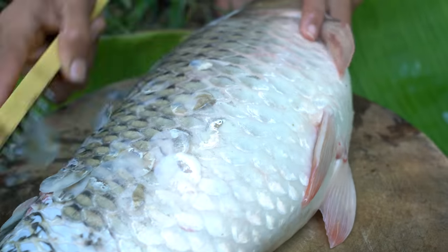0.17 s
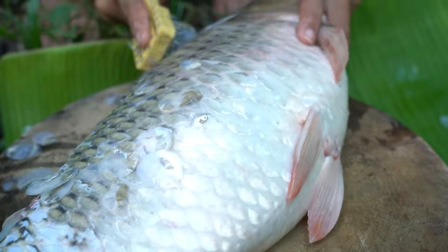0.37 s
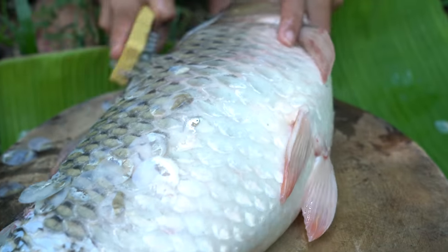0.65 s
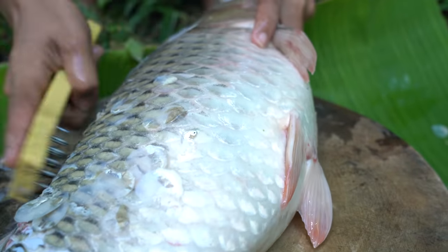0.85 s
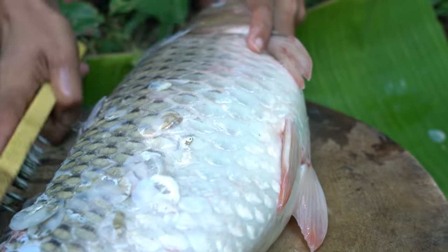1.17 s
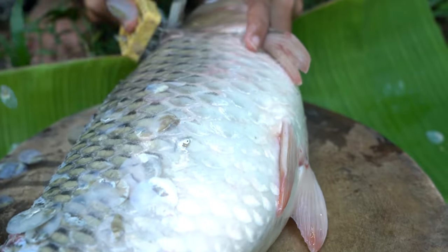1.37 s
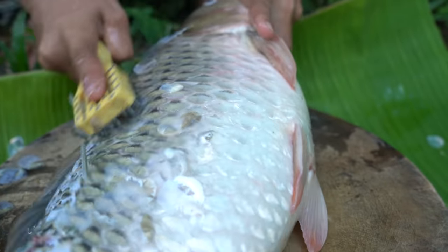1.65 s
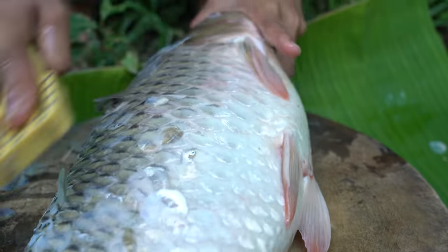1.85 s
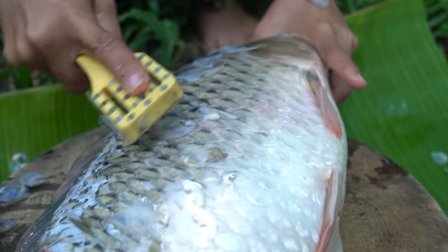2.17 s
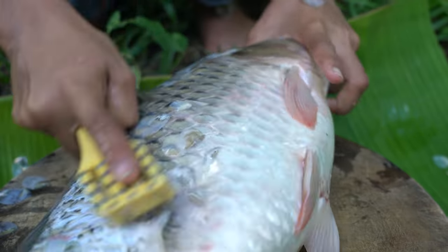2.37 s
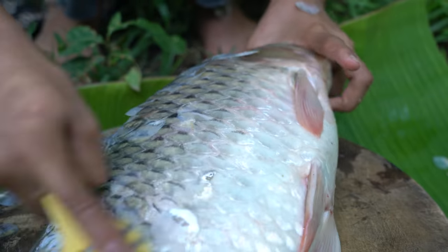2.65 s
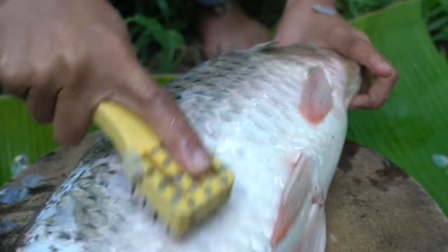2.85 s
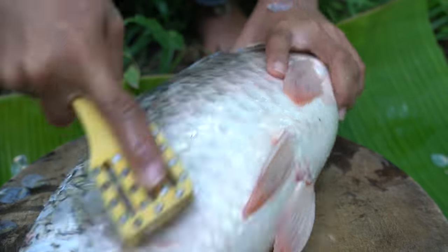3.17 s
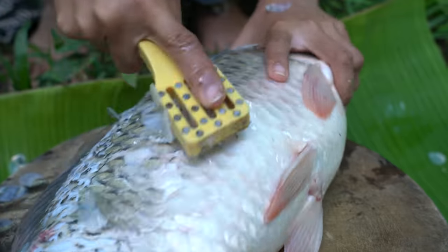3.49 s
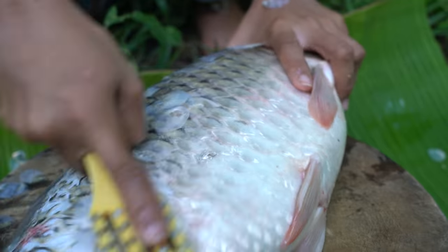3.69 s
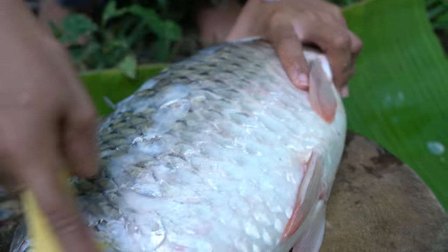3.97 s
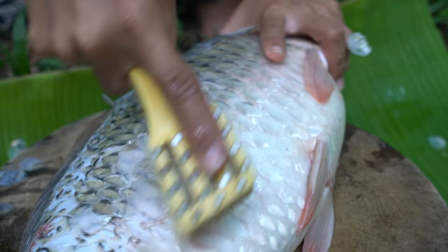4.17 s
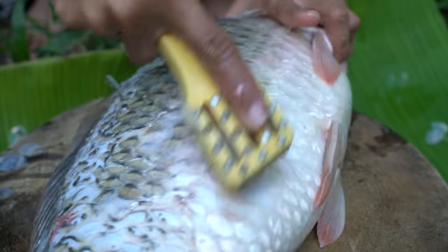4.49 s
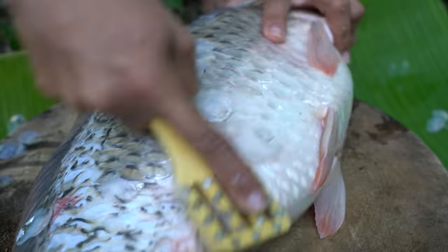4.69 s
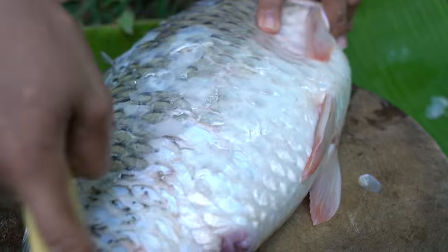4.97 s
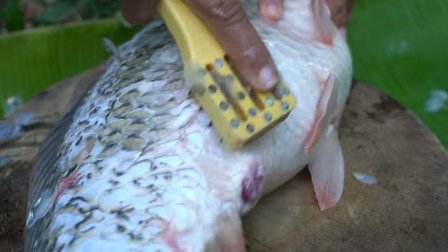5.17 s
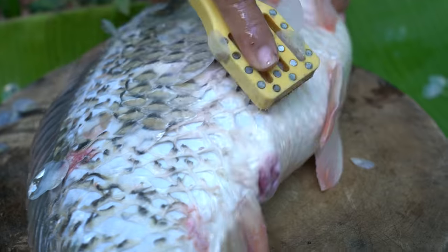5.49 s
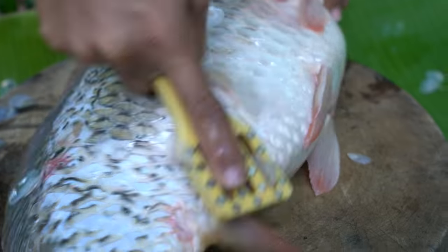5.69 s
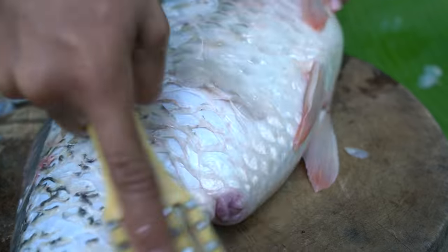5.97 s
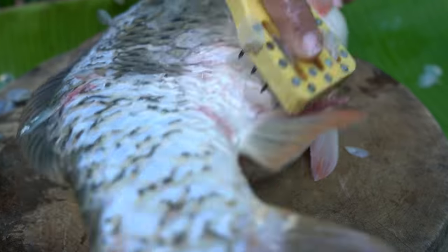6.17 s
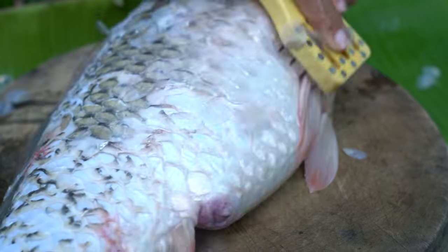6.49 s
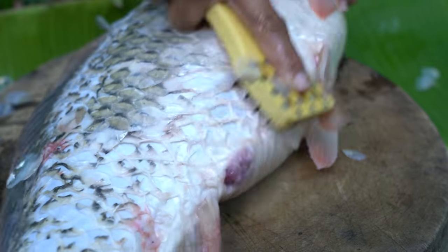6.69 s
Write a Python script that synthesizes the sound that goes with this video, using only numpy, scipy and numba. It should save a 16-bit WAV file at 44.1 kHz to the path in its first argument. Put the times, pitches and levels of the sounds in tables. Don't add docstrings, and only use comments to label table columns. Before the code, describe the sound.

Dry, gritty bursts of rasping repeat about three times a second, each roughly a tenth of a second long, full of bright clicks and high pings. Between them come light return brushes, small ticks of loose scales and spits of slime. The scraping gradually weakens and grows duller, then a cluster of wooden knocks and a brighter last scrape. Close outdoor microphone, no echo, soft garden hiss and faint wind rumble.

```python
import sys
import numpy as np
from scipy import signal
from scipy.fft import rfft, irfft
from scipy.io import wavfile
from scipy.ndimage import uniform_filter1d
from numba import njit

SR = 44100
rng = np.random.default_rng(int(sys.argv[2]) if len(sys.argv) > 2 else 0)


def undo_db(level):
    steps = np.asarray(level, float) / 20
    return 10 ** steps


def to_wav(sig):
    pcm = np.clip(np.atleast_2d(sig), -1, 1) * 32767
    pcm = np.round(pcm).astype(np.int16)
    wavfile.write(sys.argv[1], SR, pcm.T)


N = 301644
TIME = np.arange(N) / SR


def level(x, db):
    return x * undo_db(db) / np.sqrt(np.mean(x ** 2))


def noise():
    return rng.standard_normal(N)


def curve(table, s):
    return np.interp(s, *np.transpose(table))


def samples(s):
    return (np.asarray(s) * SR).astype(np.int64)


def colour(x, points):
    hz, db = np.transpose(points)
    grid = np.maximum(np.arange(2049) * SR / 4096, 1)
    log_gain = np.interp(np.log(grid), np.log(hz), db) * np.log(10) / 20
    cep = irfft(log_gain)
    cep[1:2048] *= 2
    cep[2049:] = 0
    return signal.fftconvolve(x, irfft(np.exp(rfft(cep))))[:N]


def band(x, hz, width_hz):
    return signal.lfilter(*signal.iirpeak(hz, hz / width_hz, SR), x)


@njit
def rings(at, hz, cycles, size, n):
    out = np.zeros(n)
    for k in range(len(at)):
        p = np.exp((2j * np.pi - np.log(1000) / cycles[k]) * hz[k] / SR)
        z = size[k] + 0j
        for i in range(at[k], min(n, at[k] + int(cycles[k] * SR / hz[k]))):
            out[i] += z.imag
            z *= p
    return out


def impulses(at, size):
    return np.bincount(at, size, N)[:N]


def bursts(at, size, tail_s):
    return signal.lfilter([1], [1, -np.exp(-1 / (tail_s * SR))], impulses(at, size))


def walk(rate):
    k = int(SR / rate)
    return 1.2 * uniform_filter1d(rng.standard_normal(N // 100)[np.arange(N) // k], k)


def dullness(hz):
    return 5.5 * np.log2(hz / 3000)


# frequency in Hz, level in dB.
AIR_SHAPE = [(40, 10.5), (150, 5.5), (400, 0), (3500, -8.5), (8600, -12.5), (15500, -25)]
# time in seconds, level in dB.
WIND_GUSTS = [(0.0, -54), (0.13, -58), (0.36, -49.5), (1.6, -55.5), (4.53, -56.5), (4.67, -59.5),
              (4.8, -48.5), (4.89, -61), (5.28, -54.5), (6.32, -54.5), (6.38, -52), (6.65, -63), (6.8, -54),
              (6.84, -54)]


def air():
    sway = band(band(noise(), 10.53, 1.73), 14.3, 18)
    wind = sway * undo_db(curve(WIND_GUSTS, TIME))
    fade_db = -0.9 * TIME
    hiss = colour(noise(), AIR_SHAPE) * undo_db(fade_db)
    return level(hiss, -56) + level(wind, -44.5)


# time in seconds, peak in dB, ring in Hz.
BLOCK_TAPS = [(1.269, -19, 660), (6.3984, -10, 1370), (6.4042, -10.5, 1300), (6.4083, -17, 1600),
              (6.413, -19.5, 560), (6.4165, -23.5, 480), (6.4203, -15, 1150), (6.425, -28, 750),
              (6.377, -34.5, 53), (2.598, -26, 900), (5.8, -36, 740), (2.985, -38.5, 260)]


def taps():
    s, db, hz = np.transpose(BLOCK_TAPS)
    at = samples(s)
    weight = undo_db(db - 20) * np.minimum(hz / 500, 1)
    thud = bursts(at, weight, 0.0085) * level(band(noise(), 600, 900), 0)
    return rings(at, hz, 5.6 + 0 * hz, undo_db(db + 5.5), N) + thud


# time in seconds, peak in dB.
SLIME_THREADS = [(3.1132, -8.5), (3.1606, -15), (3.4033, -30), (3.474, -18), (3.6631, -27.5),
                 (3.818, -20.5), (3.891, -23.5), (4.1425, -19), (4.1699, -13), (4.1774, -14), (4.5104, -24),
                 (4.8218, -8), (4.8838, -20)]


def spits():
    s, db = np.transpose(SLIME_THREADS)
    return bursts(samples(s), undo_db(db + 2), 0.0004) * level(band(noise(), 13000, 5500), 0)


# time in
# seconds, peak in dB, ring in Hz.
LOOSE_TICKS = [(0.9243, -15.5, 1370), (0.9385, -20, 1630), (1.2174, -14.5, 1760), (1.4785, -12.5, 3000),
               (1.5462, -15, 1360), (1.6377, -12, 3720), (1.8785, -10, 3120), (2.184, -14, 4500),
               (2.335, -25.5, 6800), (2.8455, -9.5, 4140), (2.87, -12, 3320), (2.9072, -18, 3470),
               (3.5645, -14.5, 1830), (4.2235, -14, 3200), (4.283, -19.5, 5050), (4.885, -6, 3700),
               (4.962, -11, 3700), (5.0454, -24, 1070), (5.219, -13, 3180), (5.2754, -22, 3930),
               (5.3189, -18.5, 5400), (5.5911, -16.5, 2800), (5.9857, -18, 4500), (6.227, -18, 3820),
               (6.3536, -19.5, 2430), (6.395, -6, 4200), (6.5899, -10, 4140),
               (0.17, -16, 2450), (0.7758, -20.5, 5580), (0.7983, -23, 4610), (1.4602, -22, 1160),
               (1.5198, -29, 3960), (1.6193, -20, 8700), (1.8439, -20, 3190), (1.8515, -22.5, 1010),
               (2.736, -34, 8510), (2.881, -13, 3230), (3.0813, -26, 9560), (3.095, -13, 3320),
               (3.2137, -24, 3170), (3.419, -15, 3270), (3.5996, -24, 3900), (3.6646, -25.5, 11580),
               (3.7554, -16.5, 1890), (3.9236, -24, 1600), (3.9308, -21.5, 5170), (3.9544, -25, 7170),
               (4.209, -22, 2950), (4.295, -25, 4970), (4.536, -17, 3770), (4.5465, -14, 3210),
               (4.5592, -31, 3340), (4.5897, -26, 4610), (4.8916, -13, 2800), (4.9343, -19, 3170),
               (4.9604, -14, 4720), (4.9668, -15, 5100), (5.0031, -30, 1210), (5.0259, -30, 1140),
               (5.069, -29, 6550), (5.0776, -19, 4110), (5.2231, -20, 3210), (5.2358, -24, 1250),
               (5.3666, -27, 4220), (5.4172, -19, 3620), (5.6265, -18.5, 3250), (5.6996, -28, 5040),
               (5.749, -18, 3980), (6.0418, -33, 3300), (6.0755, -14.5, 8310), (6.164, -19.5, 3850),
               (6.1886, -22, 2950), (6.3392, -23, 1090), (6.5555, -26, 1210), (6.6182, -18, 2890),
               (6.6903, -30, 2020), (6.7196, -16.5, 7340)]


def plinks():
    s, db, hz = np.transpose(LOOSE_TICKS)
    at, chance = samples(s), rng.standard_normal((len(s), 3)).T
    side = np.sign(chance[0])
    click = rings(at, hz * 1.27, 3.7 + 0 * hz, side * undo_db(db - 14), N)
    ring = rings(at, hz, 1.5 + hz * 0.011, side * undo_db(db - 12.5), N)
    ring += rings(at + 25, hz * (1 + 0.07 * chance[1]), 3 + hz * 0.0065, undo_db(db - 16), N)
    dull_db = dullness(hz)
    grit = bursts(at, undo_db(db - 22.5 + dull_db), 0.002) * level(colour(noise(), RASP_SHAPE), 0)
    spit_db = db - 21.5 + dull_db + np.minimum(dull_db, 0) + 4.3 * chance[2]
    spit = bursts(at, undo_db(spit_db), 0.00094) * level(colour(noise(), FIZZ_SHAPE), 0)
    return click + ring + grit + spit


# time in seconds, rasp in dB, dull rustle in dB re rasp.
HAND_SHIFTS = [(0.2, -65, 6), (0.55, -61.5, 13), (0.85, -58.5, 2.5), (1.25, -62, 16), (1.55, -62, 1),
               (2.0, -64.5, 10), (2.36, -70, 8), (2.72, -65, 4), (3.05, -58.5, 8), (3.36, -64, -2),
               (3.72, -64, -2), (4.33, -69, 2), (4.7, -60.5, 6), (5.03, -65, 13.5), (5.38, -66, 6),
               (5.7, -70.5, -4), (6.28, -65, 10.5), (6.67, -75, -7)]


def shifting(trail_gain):
    s, rasp_db, rustle_db = np.transpose(HAND_SHIFTS)
    loose = (undo_db(np.interp(TIME, s, rasp_db)) + trail_gain) * undo_db(5 * walk(40))
    return loose * undo_db(np.array([0 * TIME, np.interp(TIME, s, rustle_db), 0 * TIME]))


def swell(start, length, rise, first_db, last_db):
    t = TIME - start
    top = length * np.clip(rise, 0.05, 0.95)
    land_db_s, lift_db_s = 9000, 1507
    edges = land_db_s * np.minimum(t, 0) - lift_db_s * np.maximum(t - length, 0)
    away = np.interp(t, [0, top, length], [1, 0, 1]) ** 1.83
    return away * np.where(t < top, first_db, last_db) + edges


# start in seconds, length in seconds, rasp in dB,
# wet fizz in dB re rasp.
RETURN_SLIDES = [(0.147, 0.022, -32, -5), (0.446, 0.032, -42.5, -4), (1.14, 0.02, -24, -9.5),
                 (1.198, 0.033, -51, -32), (1.451, 0.045, -33.5, -13), (1.588, 0.024, -26, -2),
                 (1.609, 0.045, -37.5, -0.5), (1.848, 0.012, -39, -4), (1.881, 0.012, -37, 14),
                 (2.59, 0.095, -28.5, -1.5), (2.866, 0.03, -35.5, -7.5), (2.933, 0.076, -30.5, -3.5),
                 (3.211, 0.082, -40, -10.5), (3.276, 0.028, -26, -1.5), (3.6, 0.032, -36, 3.5),
                 (3.643, 0.022, -37, -1), (3.884, 0.031, -28, -8), (4.244, 0.055, -43.5, -0.5),
                 (4.595, 0.022, -24.5, -3), (4.639, 0.019, -40.5, -8), (4.858, 0.043, -26.5, -13),
                 (4.902, 0.075, -38, -27), (5.21, 0.021, -46, -17), (5.272, 0.073, -46, -5.5),
                 (5.615, 0.056, -39.5, -4.5), (5.694, 0.021, -49, 2.5), (5.889, 0.032, -53, -2),
                 (5.951, 0.049, -46, -7), (6.149, 0.079, -48.5, -9), (6.4, 0.01, -26, -1),
                 (6.58, 0.047, -39.5, 5)]


def slides():
    gains = 0
    for start, length, db, fizz_db in RETURN_SLIDES:
        slide = undo_db(db + swell(start, length, 0.61, -21.5, -21.5))
        gains = gains + np.outer(undo_db(np.array([0, -23, fizz_db])), slide)
    return gains


# start in seconds, length in seconds, rasp at full pressure in dB,
# share of the length before full pressure (0-1), hum of the tool in dB re rasp.
SCRAPES = [(0.0, 0.1, -13.5, 0.54, -5.5), (0.306, 0.13, -15.5, 0.38, -4.5),
           (0.619, 0.14, -15.5, 0.32, -10.5), (0.955, 0.14, -17.5, 0.43, -6),
           (1.304, 0.12, -15, 0.49, -5.5), (1.665, 0.14, -16, 0.35, -7), (2.052, 0.14, -19.5, 0.07, -9),
           (2.406, 0.15, -18, 0.38, -4.5), (2.745, 0.092, -19.5, 0.48, -14.5),
           (3.094, 0.087, -20.5, 0.71, -6.5), (3.42, .13, -19.5, 0.53, -1), (3.753, 0.11, -19, 0.73, -6.5),
           (4.063, 0.13, -17, 0.54, -7.5), (4.375, 0.15, -20.5, 0.45, -5), (4.726, 0.12, -20.5, 0.82, -2),
           (5.072, .13, -22.5, 0.33, -5), (5.409, 0.16, -25, 0.2, -6.5), (5.742, .13, -26, 0.51, 0),
           (6.072, 0.088, -31, 0.2, 4), (6.4487, 0.093, -28.5, 0.1, -27), (6.709, 0.11, -20, 0.72, -11.5)]
# time in seconds, extra fizz in dB.
WETNESS = [(0, 2), (0.7, -1), (1.7, 1), (2.4, -0.5), (3.2, 0.5), (3.8, 1), (4.4, -3), (5.1, -3), (5.8, -1),
           (6.5, 6), (6.8, -5.5)]


def strokes():
    gains, trails = 0, 0
    bed_db = -3.5
    for start, length, db, rise, hum_db in SCRAPES:
        fizz_db = -4 + curve(WETNESS, start)
        press = undo_db(db + bed_db + swell(start, length, rise, -19, -8.5))
        gains = gains + np.outer(undo_db(np.array([0, hum_db, fizz_db])), press)
        after = TIME - start - length
        trails = trails + (after > 0) * undo_db(db - 42 - 132 * np.abs(after))
    return gains, trails


# time in seconds, change in dB.
LEVEL_CHANGES = [(0.435, -7), (0.535, -7), (0.624, -5), (0.661, -6), (0.711, 6.5), (0.815, 8), (0.906, 8),
                 (1.176, -12.5), (1.259, 6), (1.697, -5.5), (2.068, -7.5), (2.092, 7), (2.114, -6),
                 (2.167, 6.5), (2.47, -5), (2.408, 6), (2.62, 5.5), (3.42, 6), (5.746, 7), (5.815, 5),
                 (3.104, 6), (3.545, -7.5), (3.761, 6.5), (4.525, -9), (4.738, -5), (4.792, -9), (5.128, -4),
                 (4.876, -9), (5.756, -9), (6.546, -8.5), (6.714, -10)]


def contact():
    gains, trails = strokes()
    gains = gains + slides() + shifting(trails)
    change_db = sum(db * np.exp(-((TIME - s) / 0.0058) ** 2) for s, db in LEVEL_CHANGES)
    return uniform_filter1d(gains * undo_db(change_db), size=60)


def crackle(per_s, spread_db, tail_s, cycles, low_hz, octaves):
    most = int(N / SR * 3000)
    chance = rng.random((most, 4))[:int(N / SR * per_s)].T
    at = (chance[0] * N).astype(np.int64)
    size = undo_db(-spread_db * np.log(1 - 0.97 * chance[1]) + 2.8 * walk(130)[at])
    grit = level(bursts(at, size, tail_s) * noise(), 0)
    climb = octaves * (0.5 + 0.334 * walk(45)[at] + 0.14 * chance[2])
    hz = np.clip(low_hz * 2 ** climb, 100, 15000)
    ring = rings(at, hz, cycles * (1.6 + chance[3]), size * np.sign(chance[3] - 0.5), N)
    return grit, level(ring, 0)


# frequency in Hz, level in dB.
RASP_SHAPE = [(470, -41.5), (800, -11), (1580, -3.5), (2100, -4.5), (3270, -0.5), (6300, -3), (8190, -43),
              (13900, -120)]
# frequency in Hz, level in dB.
FIZZ_SHAPE = [(3530, -37), (6000, -0.5), (8330, 3.5), (11300, -10), (13500, -4), (15200, -14.5),
              (16200, -17)]
# resonance in Hz, width in Hz, level in dB, change in dB per s as the grip shifts.
TOOL_MODES = [
    (1700, 290, -7, 2.3),
    (830, 800, 2, -1.87),
    (380, 140, -3, -6),
    (130, 140, -20, 0.5),
]


def rasp(rasp_gain, hum_gain, fizz_gain):
    grit, ring = crackle(750, 2.4, 0.0012, 20, 2200, 1.3)
    spit, ping = crackle(900, 6.1, 0.0021, 37, 8496, 0.14)
    rub, knock = crackle(400, 0.63, 0.0017, 14.0, 842, 0.97)
    body = level(colour(grit, RASP_SHAPE), 0.095) + level(ring, -4.5)
    slick = undo_db(np.interp(TIME, (1.8, 2.2), [-5, 0]))
    fizz = level(colour(0.56 * grit + 0.7 * spit, FIZZ_SHAPE), 0.17) + level(ping, -4) * slick
    drive = 0.13 * grit + 3.9 * rub
    hollow = sum(undo_db(db + drift * TIME) * band(drive, hz, width) for hz, width, db, drift in TOOL_MODES)
    hum = level(hollow, -4) + level(knock, -13)
    return rasp_gain * body + hum_gain * hum + fizz_gain * fizz


def small_scales(press_db):
    per_s = 40
    count = int(per_s * N / SR)
    s, chance = (np.arange(count) + rng.random(count)) / per_s, rng.standard_normal((count, 3)).T
    db = press_db[samples(s)] + 2 + 2.5 * chance[0]
    return np.transpose([s, db, 3300 * 2 ** (0.4 * chance[1]), -3 + 5 * chance[2]])


def slime_pops():
    count = int(45 * N / SR)
    s, chance = rng.random(count) * N / SR, rng.standard_normal((count, 2)).T
    db = np.interp(s, *np.transpose(HAND_SHIFTS)[:2]) + 3 - 1.5 * chance[0]
    hz = np.clip(6370 * 2 ** (0.4 * chance[1]), 900, 14000)
    return np.transpose([s, db, hz, 2 + 0 * s])


def touches(press_db):
    return [(row[0] + 0.00084, press_db[int(row[0] * SR) + 100] + 10, 3300, -1) for row in SCRAPES]


# time in seconds, peak in dB.
TOOTH_PINGS = [(0.106, -6), (0.3156, 8.5), (0.3588, -7), (0.639, 6.5), (0.7195, 7.5), (0.731, 6.5),
               (1.063, 5.5), (1.0724, 5), (0.059, 2), (0.759, -6), (1.089, -6), (1.409, 2.5), (1.7221, 7.5),
               (1.8882, -22), (2.173, -4), (2.487, -3), (2.4552, 2.5), (2.973, -8), (3.1138, 4.5),
               (3.2837, -0.5), (3.527, 1.5), (3.6172, -15), (3.892, -3.5), (3.8974, 0.5), (4.606, -9),
               (4.649, -11), (5.4721, -2), (5.7624, -4), (6.4507, -4), (6.527, 0), (2.52, -1), (2.766, 1),
               (3.534, -3.5), (4.406, -12), (6.836, -4.5)]


def pings():
    return [(s, db, 8680 * (1 + 0.081 * rng.standard_normal()), -8.5) for s, db in TOOTH_PINGS]


# time in seconds, peak in dB, ring in Hz, brightness in dB re peak.
BIG_SNAPS = [(0.013, 2.5, 3700, 1), (0.0891, -8.5, 3760, 12.5), (0.3461, -5.5, 3640, 10.5),
             (0.3844, 5.5, 3300, -1), (0.3893, 1, 2180, 0), (0.3998, 8, 2460, -16), (0.4164, 4, 3420, -4),
             (0.4461, 9, 3820, -11.5), (0.7462, 9, 4300, -8), (0.988, -1, 3600, -1), (1.0429, 4, 3460, -19),
             (1.0522, 8, 4970, -10), (1.3809, 6, 5600, -27), (1.3986, 7, 5100, -1.5),
             (1.5902, -5.5, 3450, -9.5), (1.7844, -9.5, 3330, 8.5), (2.1608, 2, 4200, -13),
             (2.5232, 9.5, 3120, -10), (2.7689, 1.5, 3380, -4), (2.8218, 0.5, 3780, -25),
             (3.4836, 2, 3660, -33), (4.1425, -11, 3400, -30), (4.539, -3, 3450, -17),
             (5.1792, 2, 4630, -11), (5.7681, -1.5, 3000, -8.5), (6.4881, 1.5, 4020, -14),
             (6.8048, -2, 2970, -15), (6.8167, 1, 2750, -2)]
# time in seconds,
# peak in dB, ring in Hz.
TOOL_JOLTS = [(0.3725, -3, 1520), (0.961, -11, 1490), (1.0124, -3.5, 1830), (1.4222, -3.5, 2020),
              (1.6844, -19, 2280), (2.073, -12, 2540), (2.4621, -2, 2050), (2.5356, 0, 4030),
              (2.8028, 1, 1460), (3.475, 0.5, 1280), (3.7781, -4, 1790), (4.0914, 0.5, 1860),
              (4.3834, -11.5, 1790), (4.4115, -1, 1820), (4.507, -7.5, 1440), (4.7708, -0.5, 1810),
              (4.8222, 3, 3520), (5.0973, -10.5, 1750), (5.117, -3, 1680), (5.126, -5, 1730),
              (5.4363, -7, 1730), (5.491, 4, 3100), (6.106, -7.5, 1800), (6.1174, -5, 1830),
              (6.1248, -0.5, 1580), (6.3988, -3, 2200)]
# time in seconds, peak in dB, ring in Hz.
EARLY_CATCHES = [(0.0204, 0, 5700), (0.0403, 4.5, 4300), (0.0765, 2.5, 3530), (0.0836, 0, 2950),
                 (0.112, -13, 2710), (0.118, -18, 5300), (0.3263, 3, 3300), (0.3521, 3, 3270),
                 (0.3728, 4, 1410), (0.3902, 0, 2150), (0.407, 0, 1590), (0.427, 0, 3340),
                 (0.443, -10, 8330), (0.6825, 1, 2820), (0.702, -5, 3080), (0.963, -12, 1530),
                 (0.9993, 0, 3640), (1.0314, 5.5, 3010), (1.081, 2, 8530), (1.1014, -5.5, 8500),
                 (1.3254, -4, 8700), (1.3514, 7.5, 4850), (1.3673, 1, 3320), (1.608, -11, 3770),
                 (1.6313, -16, 2930), (1.684, 0.5, 4740), (1.7181, 4, 3210), (1.7389, -2.5, 3450),
                 (1.7486, -4, 3640), (1.753, 0, 3900), (1.7706, -0.5, 3270), (1.788, 1, 3320),
                 (1.7987, -1.5, 8300), (1.813, -5.5, 4160), (2.0776, -1, 2860), (2.1077, 3, 4520),
                 (2.119, -1, 4930), (2.1253, -6, 1610), (2.418, -9.5, 2450), (2.4217, -6.5, 3980),
                 (2.4631, 5, 2090), (2.4871, 5, 4020), (2.543, 0, 4050), (2.562, -10.5, 2200),
                 (2.5688, -18, 8290), (2.63, -13, 4550), (2.6527, -6, 4240), (2.6558, -11, 2610),
                 (2.6745, -16.5, 3360), (2.757, -8, 3700), (2.776, 2, 3080), (2.7977, 3, 3770),
                 (2.813, -6, 3270), (2.8357, -7.5, 3530), (2.9833, -8, 9300)]
# time in seconds, peak in dB, ring in Hz.
LATE_CATCHES = [(3.1102, -4, 3860), (3.121, -7, 2820), (3.1562, -6.5, 2930), (3.1596, -2, 3100),
                (3.1722, -3.5, 3900), (3.424, -14, 2480), (3.441, -5.5, 3360), (3.448, -3, 3660),
                (3.4692, -4, 2630), (3.484, 6.5, 3770), (3.8028, -6.5, 2990), (3.818, 2, 8000),
                (3.8275, 2.5, 4130), (3.835, -6, 3550), (3.846, 2, 8960), (3.8538, -0.5, 2710),
                (4.0788, -9.5, 1820), (4.0847, -7, 1660), (4.1116, -1.5, 4460), (4.118, -0.5, 3830),
                (4.136, 0, 3130), (4.171, 5, 6460), (4.178, 0.5, 2540), (4.198, -8, 3100),
                (4.3916, -7, 3000), (4.3998, -3.5, 3340), (4.4165, -4, 1850), (4.4324, -10, 2780),
                (4.4717, -1.5, 2470), (4.5009, -6.5, 2480), (4.5062, -5, 1510), (4.5116, -2, 3100),
                (4.7507, -12, 1770), (4.7764, -6, 1740), (4.8287, -0.5, 3720), (4.8332, 3, 3600),
                (5.088, -15, 1740), (5.1316, 2.5, 1700), (5.152, -8, 3120), (5.185, -2.5, 2840),
                (5.4244, -13, 1790), (5.4453, -1, 2910), (5.501, -3, 4550), (5.507, -6, 4700),
                (5.513, -16, 2950), (5.5278, -13, 3170), (5.5304, -9, 3470), (5.799, -7, 4690),
                (5.8287, -5, 4760), (5.848, -9.5, 2950), (5.8573, -11.5, 2460), (5.8634, -13, 2760),
                (6.088, -10, 6030), (6.1334, -7, 2750), (6.4051, 0.5, 1260), (6.472, -6, 2820),
                (6.523, -1, 5000), (6.536, -7.5, 8100), (6.7552, -4, 2880), (6.8048, -0.5, 2700)]


def releases(press):
    press_db = 20 * np.log10(press)
    jolts = [(*jolt, -9.5) for jolt in TOOL_JOLTS]
    early = [(s, db - 0.5, hz, -7) for s, db, hz in EARLY_CATCHES]
    late = [(s, db - 0.5, hz, -9.5) for s, db, hz in LATE_CATCHES]
    listed = [*BIG_SNAPS, *pings(), *jolts, *early, *late]
    return np.vstack([listed, touches(press_db), small_scales(press_db), slime_pops()])


def snaps(press):
    s, db, hz, bright_db = releases(press).T
    at, side = samples(s), np.sign(rng.standard_normal(len(s)))
    ring = rings(at, hz, 6 + hz * 0.0071, side * undo_db(db - 9.5), N)
    dull_db = np.minimum(dullness(hz), 0)
    kick = impulses(at, side * undo_db(db + 0.5 * dull_db))
    bright_kick = impulses(at, side * undo_db(db - 4 + dull_db))
    click = undo_db(-0.5) * colour(kick, RASP_SHAPE) + colour(bright_kick, FIZZ_SHAPE)
    click += undo_db(-17) * band(kick, 900, 479)
    crack = level(colour(noise(), RASP_SHAPE), 0)
    fizz = level(colour(noise(), FIZZ_SHAPE), 0)
    spray = uniform_filter1d(bursts(at, undo_db(db - 17), 0.00069), size=60)
    spray += bursts(at, undo_db(db - 27), 0.004)
    return ring + click + spray * crack + bursts(at, undo_db(db + bright_db - 7.5), 0.00079) * fizz


def scene():
    gains = contact()
    return (rasp(*gains) + snaps(gains[0]) + plinks() + taps() + air() + spits())[None]


def top_cut(x):
    return signal.sosfilt(signal.butter(12, 15850, fs=SR, output="sos"), x)


def record(dry):
    top_hz = 15900
    cut = signal.sosfilt(signal.ellip(8, 0.2, 50, top_hz, fs=SR, output="sos"), dry)
    cut = cut - 0.26 * band(cut, 6320, 1340)
    return top_cut(np.clip(cut, -1, 1))


dry = scene()
out = record(dry)
to_wav(out)
```